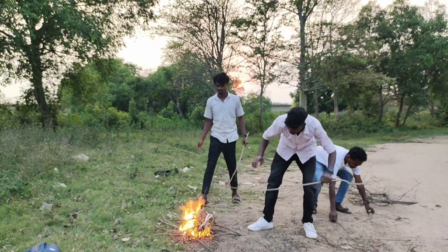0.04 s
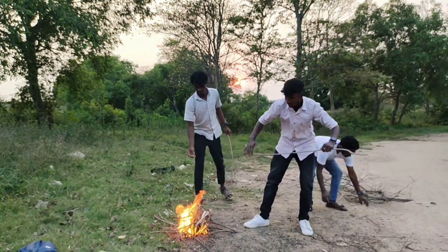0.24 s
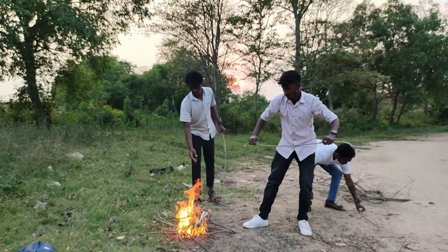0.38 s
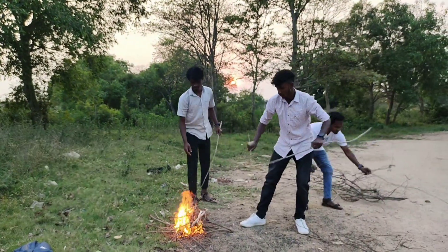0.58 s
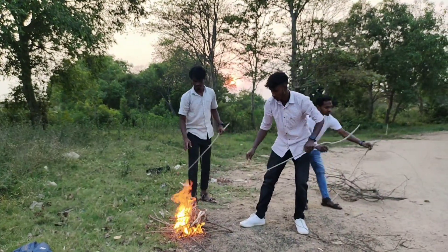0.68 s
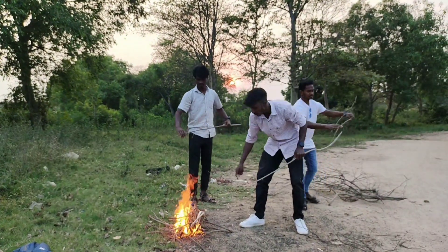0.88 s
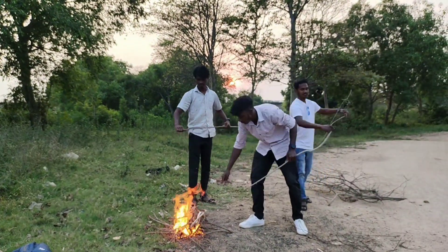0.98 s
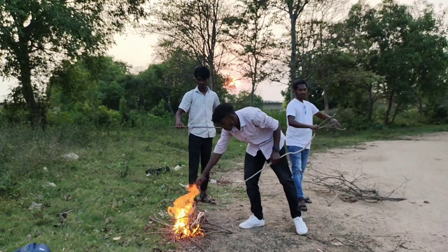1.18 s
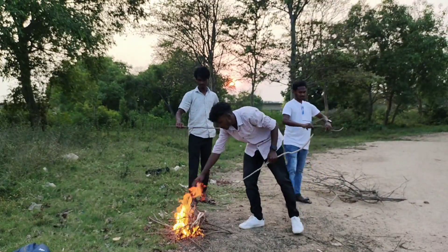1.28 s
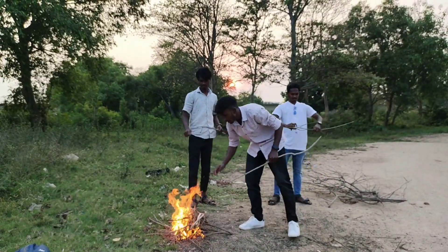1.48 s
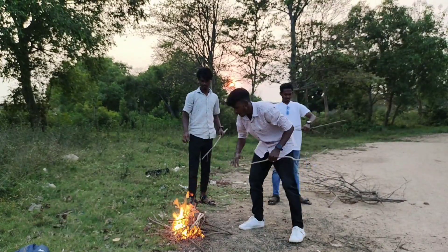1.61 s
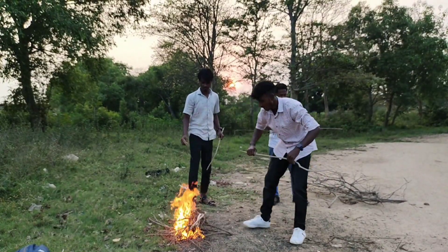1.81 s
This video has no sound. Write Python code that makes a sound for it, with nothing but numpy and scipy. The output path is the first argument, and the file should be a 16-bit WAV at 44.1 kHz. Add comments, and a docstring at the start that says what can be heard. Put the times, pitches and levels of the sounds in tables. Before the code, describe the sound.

A small twig fire crackles with one loud pop, over droning insects and twittering birds.

```python
"""Outdoors, beside a small fire of dry twigs. One twig bursts with a loud pop that echoes from
ground and bushes; smaller fractures snap and ring, escaping gas sizzles and the embers crackle.
Insects drone on the right and small birds twitter on the left. A low throb, perhaps a distant
engine, comes in groups of four over a soft rumble; its opening beats sound louder and brighter,
like dull knocks, on the left."""
import sys
import numpy as np
from scipy import signal
from scipy.fft import rfft, irfft
from scipy.io import wavfile
from scipy.ndimage import uniform_filter1d

SR = 44100
rng = np.random.default_rng(int(sys.argv[2]) if len(sys.argv) > 2 else 0)


def bounce(signal):
    """Save signal as a 16-bit WAV file at the path given by the first command-line argument."""
    frames = np.transpose(np.atleast_2d(signal))
    limited = np.clip(frames, -1, 1)
    pcm = np.round(limited * 32767).astype(np.int16)
    wavfile.write(sys.argv[1], SR, pcm)


N = 81585
T = np.arange(N) / SR

# Spectra of the surroundings: frequency_hz, relative_db
RUMBLE_SPECTRUM = [(20, -40), (45, -36), (70, -3.5), (105, 2.5), (180, 1), (250, -7.5), (450, -9),
                   (700, -30.5), (1500, -29.5), (4000, -95)]
AIR_SPECTRUM = [(100, 9), (700, 4), (1200, -2.5), (2500, -3.5), (5000, -4.5), (6600, -6), (9000, -4.5),
                (11000, -11), (15000, -11), (16000, -26)]
CHORUS_SPECTRUM = [(5000, -48), (6600, -21.5), (7200, 1.5), (7600, 0.5), (8200, 4), (8700, -5), (9100, -3),
                   (9800, -10.5), (10500, -32), (13000, -58)]
FLOCK_SPECTRUM = [(2000, -28), (3000, 1), (3900, 10), (4300, 4.5), (5000, 3.5), (5800, -23), (6600, -5),
                  (8000, -58)]
THROB_SPECTRUM = [(60, -45), (130, -1.5), (230, -3), (300, 1), (380, -15.5), (500, -5.5), (600, -28.5),
                  (900, -46)]
OPENING_BEAT_SPECTRUM = [(40, -59), (150, 1.5), (300, 12), (600, 7), (1100, 3), (1800, -27), (4000, -7),
                         (9000, -70), (16000, -77)]
# Insect voices: centre_hz, sweep_hz, sweeps_per_s, bandwidth_hz, level_db
INSECT_VOICES = [(8520, 196.7, 17, 140, -58.5), (8234, 170.5, 30, 170, -57.5)]
# Bird notes: start_s, length_s, start_hz, end_hz, level_db
BIRD_NOTES = [(.008, 0.039, 5550, 5950, -50), (0.033, 0.027, 5850, 4930, -55),
              (0.079, 0.028, 5300, 4860, -56), (0.124, 0.045, 5550, 5120, -57),
              (0.184, .028, 5240, 4850, -53), (0.245, .032, 5930, 6260, -51.5),
              (0.319, 0.019, 5860, 5340, -49.5), (.342, 0.028, 5300, 4700, -50.5),
              (.355, 0.024, 5710, 5930, -55), (0.392, 0.031, 5530, 5820, -56.5),
              (0.405, 0.025, 3780, 4090, -55.5), (0.423, .036, 5490, 5060, -50),
              (0.487, 0.016, 4720, 3700, -53), (0.524, .03, 5230, 4560, -53),
              (0.587, 0.015, 5960, 5550, -55), (0.629, 0.028, 6050, 5570, -53),
              (0.659, .05, 5480, 5140, -53.5), (0.736, .042, 4200, 3700, -55),
              (0.739, 0.019, 5000, 4400, -53.5), (.77, 0.02, 4970, 4390, -50.5),
              (.803, 0.025, 4570, 4970, -53.5), (0.844, 0.028, 4500, 4760, -51.5),
              (0.95, .048, 4510, 4860, -65.5), (1.12, 0.013, 5680, 4660, -61),
              (1.156, 0.013, 5340, 5050, -62), (1.202, 0.017, 6500, 5820, -50.5),
              (1.22, 0.014, 6100, 5720, -59), (1.277, 0.015, 5950, 5680, -56),
              (1.305, .042, 5110, 6350, -59), (1.379, .022, 5080, 4780, -62.5),
              (1.531, 0.017, 5650, 4550, -52), (1.552, 0.032, 5200, 4700, -49),
              (1.62, 0.03, 5400, 4560, -49.5), (1.669, 0.031, 5200, 4640, -52),
              (1.721, 0.021, 5120, 4670, -55), (1.754, 0.021, 5320, 4940, -54),
              (1.78, 0.023, 5250, 4640, -51.5), (1.809, .028, 5050, 4330, -55.5)]
# Level of the birds that join in, relative to each note: time_s, relative_db
NEIGHBOUR_LEVELS = [(0, -15), (.8, -10), (1.0, -17), (1.85, -17)]
# Accents of the four beats in a group: relative_db
BEAT_ACCENTS = [-4.5, -3, -2.5, -3.5]
# The throb's louder opening beats: start_s, level_db
OPENING_BEATS = [(0.0255, -36), (0.0593, -41.5), (0.0872, -43.5)]

# Spectra of the fire's sounds, the pop at each ear: frequency_hz, relative_db
RUSTLE_SPECTRUM = [(100, -25), (350, 5), (800, 9), (2000, 3), (3500, -4.5), (7000, -31), (16000, -20)]
GAS_SPECTRUM = [(300, 14.5), (1500, -17), (3600, 8.5), (6000, 0), (9000, -1), (12000, -2), (16000, -7)]
CRACK_SPECTRUM = [(200, -66), (1000, 0.5), (3000, 5.5), (6000, 3), (9000, 8), (13000, 4), (16000, 2)]
POP_LEFT_SPECTRUM = [(100, -55), (380, -5), (900, -14.5), (1800, -10), (2300, -7), (3400, 4.5), (4600, -3),
                     (6000, -20.5), (7200, 5), (7900, -23), (9100, -13), (10200, -7), (11800, 0.5),
                     (14000, -8), (16000, -17)]
POP_RIGHT_SPECTRUM = [(100, -43), (380, 0), (900, -9.5), (1800, -0.5), (3000, -23.5), (4400, 4.5),
                      (6000, -9.5), (7600, 8.5), (8500, 5), (10000, 2), (12000, -3), (14000, 3.5),
                      (16000, -7.5)]
# Rustles of twigs and dry ground: centre_s, half_width_s, level_db
RUSTLE_EVENTS = [(0.344, 0.01, -60.5), (0.642, 0.014, -60.5), (0.777, 0.011, -63), (1.037, 0.023, -65),
                 (1.077, 0.018, -61.5), (1.288, 0.015, -60), (1.342, 0.018, -63), (1.439, 0.013, -60.5),
                 (1.588, 0.12, -71), (1.717, 0.017, -65)]
# Spurts of escaping gas: start_s, length_s, level_db
GAS_SPURTS = [(0.338, 0.017, -50.5), (1.019, .03, -52)]
# Small fractures: start_s, ring_db, pitch_hz, ring_t60_s, crack_db
FRACTURES = [(0.0392, -33.5, 3600, 0.0045, -55), (.0982, -27.5, 3530, 0.0046, -41.5),
             (.1, -34, 3630, 0.023, -59), (0.1098, -62, 3700, .008, -44), (.3392, -38.5, 3860, 0.0047, -47),
             (0.802, -41.5, 3760, 0.0053, -39), (0.929, -41, 2200, 0.0031, -43),
             (1.0129, -38.5, 3510, 0.0035, -39.5), (1.028, -41, 3300, 0.0046, -56),
             (1.034, -41.5, 3180, 0.0055, -48), (1.4275, -30, 3480, 0.0026, -38.5),
             (1.594, -51, 3020, .004, -39), (1.6297, -42.5, 1400, .004, -56)]
# Modes of the bursting twig: pitch_hz, level_db, t60_s
TWIG_MODES = [(428, -36, 0.038), (1444, -35, 0.042), (2207, -27, .028), (2570, -38, 0.047),
              (2980, -35, 0.047), (3270, -36, 0.034), (3560, -38, 0.035), (4086, -35.5, 0.039),
              (8710, -29.5, 0.045), (11400, -31, 0.02)]


def amp(db):
    """Amplitude grows tenfold for every 20 dB."""
    return 10 ** (np.asarray(db) / 20)


def unit(x):
    """Normalisation to an rms of 1."""
    return x / np.sqrt(np.mean(x ** 2) + 1e-20)


def spectral_gain(spectrum, hz):
    """A spectral envelope, interpolated in decibels over log frequency."""
    points_hz, db = np.transpose(spectrum)
    return amp(np.interp(np.log(hz + 1), np.log(points_hz), db))


def add(mix, start_s, sound):
    """Superposition: a sound adds to the mix from its start time."""
    part = mix[..., max(round(start_s * SR), 0):][..., :sound.shape[-1]]
    part += sound[..., :part.shape[-1]]


def pan(db):
    """Interaural level difference, left minus right, as two gains."""
    return amp([[db / 2], [-db / 2]])


def noise(spectrum, coherence):
    """Partial coherence: coloured noise of which the ears share a part."""
    white = rng.standard_normal((3, N))
    ears = np.sqrt(coherence) * white[2] + np.sqrt(1 - coherence) * white[:2]
    return unit(irfft(rfft(ears) * spectral_gain(spectrum, np.fft.rfftfreq(N, 1 / SR)), N))


def drift(cutoff_hz):
    """Random modulation: low-passed noise of unit rms."""
    low_pass = np.exp(-(np.fft.rfftfreq(N, 1 / SR) / cutoff_hz) ** 2)
    return unit(irfft(rfft(rng.standard_normal(N)) * low_pass, N))


def impulse(spectrum, size=2048):
    """Minimum phase turns a spectrum into a causal click of unit energy."""
    log_gain = np.log(spectral_gain(spectrum, abs(np.fft.fftfreq(size, 1 / SR))))
    click = np.fft.ifft(np.exp(signal.hilbert(log_gain).conj())).real[:size // 2]
    return click / np.linalg.norm(click)


def scatter(t60_s, size=12000):
    """Diffuse scattering from ground and bushes: a decaying stereo tail of unit energy."""
    tail = rng.standard_normal((2, size)) * amp(-60 * T[:size] / t60_s)
    return tail / np.linalg.norm(tail, axis=1, keepdims=True)


def through(x, response):
    """Linear filtering: convolution with an impulse response."""
    return signal.fftconvolve(np.atleast_2d(x), np.atleast_2d(response), axes=1)[:, :N]


def background(rumble_db=-56.5, air_db=-61.5):
    """Broadband noise: a coherent low rumble and the diffuse hiss of open air, both wavering."""
    rumble = amp(rumble_db + 1.27 * drift(22)) * noise(RUMBLE_SPECTRUM, coherence=1.0)
    air = amp(air_db + 2.67 * drift(32)) * noise(AIR_SPECTRUM, coherence=0.13)
    return pan(0.42) * rumble + pan(1.1) * air


def insects(chorus_db=-58.5, rate_spread=.25, depth_spread=0.2945, left_db=-17):
    """Frequency modulation: two shrill voices warble quickly above a steady chorus."""
    out = amp(chorus_db + 1.3 * drift(120)) * noise(CHORUS_SPECTRUM, coherence=0.48)
    for hz, sweep_hz, rate, width_hz, db in INSECT_VOICES:
        depth = 1 + depth_spread * drift(29.8)
        warble = depth * np.sin(2 * np.pi * np.cumsum(rate * (1 + rate_spread * drift(12))) / SR)
        carrier = np.exp(2j * np.pi * np.cumsum(hz + sweep_hz * warble) / SR)
        broadening = 1 + drift(width_hz) + 1j * drift(width_hz)
        out += amp(db) * unit((carrier * broadening).real)
    return amp([[left_db], [0]]) * out


def chirp(length_s, start_hz, end_hz, jitter_hz=70):
    """A frequency glide: one thin, unsteady note that swells and fades."""
    progress = np.arange(0, length_s, 1 / SR) / length_s
    jitter = np.interp(progress, np.linspace(0, 1, 12), rng.standard_normal(12))
    hz = start_hz + (end_hz - start_hz) * progress + jitter_hz * jitter
    return np.sin(np.pi * progress) ** 0.56 * np.sin(2 * np.pi * np.cumsum(hz) / SR)


def birds(neighbours=8, spread_s=.022, pitch_spread=.07, roughness=.45, flock_db=-63.5, right_db=-10.5):
    """Chorus effect: fainter neighbours join each chirp, off in time and pitch, over a far flock."""
    calls = np.zeros(N)
    for start_s, length_s, start_hz, end_hz, db in BIRD_NOTES:
        add(calls, start_s, amp(db) * chirp(length_s, start_hz, end_hz))
        neighbour_db = db + np.interp(start_s, *np.transpose(NEIGHBOUR_LEVELS))
        for offset, detune, bend in rng.standard_normal((neighbours, 3)):
            start_ratio, end_ratio = np.exp(pitch_spread * np.array([detune, detune + .5 * bend]))
            note = chirp(length_s, start_hz * start_ratio, end_hz * end_ratio)
            add(calls, start_s + spread_s * offset, amp(neighbour_db) * note)
    calls *= 1 + roughness * drift(520)
    flock = amp(flock_db + 2 * drift(46)) * noise(FLOCK_SPECTRUM, coherence=0.044)
    reverberation = amp(-6) * through(calls, scatter(t60_s=.25))
    return amp([[0], [right_db]]) * (calls + reverberation + flock)


def throb(start_s=.0018, group_s=.2506, beat_s=.0302, level_db=-41, uneven_db=1.73,
          centre_hz=260, fall_hz_per_s=73000):
    """Group delay: in each soft beat the lows arrive last, so its pitch falls. Beats come in fours."""
    beats, hz = np.zeros(N), np.fft.rfftfreq(2048, 1 / SR)
    for group in range(8):
        for beat, accent_db in enumerate(BEAT_ACCENTS):
            at = round((start_s + group * group_s + beat * beat_s) * SR)
            beats[at:at + 1] = amp(level_db + accent_db + uneven_db * rng.normal())
    phase = np.pi * (hz - centre_hz) ** 2 / fall_hz_per_s
    pulse = np.fft.fftshift(irfft(1j * spectral_gain(THROB_SPECTRUM, hz) * np.exp(1j * phase)))
    return pan(3.2) * signal.fftconvolve(beats, pulse / abs(pulse).max(), "same")


def opening_beats(ring_hz=285, ring_t60_s=0.034, ring_db=-5):
    """Damped resonance: the throb's first beats, louder and brighter, like dull knocks on the left."""
    t, out, click = T[:1024], np.zeros(N), impulse(OPENING_BEAT_SPECTRUM)
    ring = amp(ring_db - 60 * t / ring_t60_s) * np.cos(2 * np.pi * ring_hz * t)
    beat = click / abs(click).max() + ring
    for start_s, db in OPENING_BEATS:
        add(out, start_s, amp(db) * beat)
    return pan(19.0) * out


def embers(ticks_per_s=60, spread_db=0.5, level_db=-74):
    """A Poisson process: independent ticks make a faint, dull crackle deep in the embers."""
    ticks = (rng.random(N) < ticks_per_s / SR) * amp(spread_db * np.minimum(rng.exponential(1, N), 3))
    dull_ticks = through(ticks, impulse(RUSTLE_SPECTRUM))
    return amp(level_db) * pan(1.7) * unit(through(dull_ticks, scatter(t60_s=0.0052)))


def sizzles_and_rustles(edge_s=0.0013, grain_db=1.0):
    """Amplitude-modulated noise: gas hisses out in short grainy spurts, and dry twigs rustle."""
    spurts = np.zeros(N)
    for start_s, length_s, db in GAS_SPURTS:
        attack = np.clip((T - start_s) / edge_s, 0, 1)
        release = np.exp(-np.maximum(T - start_s - length_s, 0) / edge_s)
        spurts += amp(db) * attack * release
    swells = sum(amp(db) * np.exp(-((T - centre_s) / half_width_s) ** 2 / 2)
                 for centre_s, half_width_s, db in RUSTLE_EVENTS)
    grain = unit(amp(grain_db * drift(420)))
    gas = pan(3.6) * spurts * noise(GAS_SPECTRUM, coherence=0.38)
    rustle = pan(1.4) * swells * noise(RUSTLE_SPECTRUM, coherence=0.53)
    return grain * (gas + rustle)


def snaps(ring_top_hz=4800, rise_s=.0003, pitch_spread=0.11, crack_t60_s=0.0029, scatter_db=-8):
    """Impulsive excitation: small fractures crack and the wood rings briefly; the ground scatters both."""
    t, rings, cracks = T[:3000], np.zeros(N), np.zeros(N)
    for start_s, ring_db, hz, t60_s, crack_db in FRACTURES:
        wobble = uniform_filter1d(rng.standard_normal(len(t)), 9) * 3  # unit variance
        phase = 2 * np.pi * np.cumsum(hz * (1 + pitch_spread * wobble)) / SR
        envelope = np.minimum(t / rise_s, 1) * amp(ring_db - 60 * t / t60_s)
        add(rings, start_s, envelope * np.sin(phase))
        add(cracks, start_s, amp(crack_db - 60 * t / crack_t60_s) * rng.choice([-1., 1.], len(t)))
    rings = signal.sosfilt(signal.butter(6, ring_top_hz, fs=SR, output="sos"), rings)
    direct = pan(9.7) * rings + pan(2.0) * through(cracks, impulse(CRACK_SPECTRUM))
    return direct + amp(scatter_db) * through(direct, scatter(t60_s=.045))


def rupture(t, spike=1.28, fast_t60_s=0.02, slow_t60_s=0.054, fibres=4, gap_s=.0004, fibre_t60_s=0.017,
            ground_echo_s=.0016, ground_echo_db=-5.5):
    """Brittle fracture: a spike, fibres tearing in turn, a ground echo and a fading spray of cracks."""
    decay = amp(-60 * t / fast_t60_s) + amp(-8 - 60 * t / slow_t60_s)
    pulses = rng.choice([-1., 1.], (2, len(t))) * decay
    pulses[:, 0] = spike
    for tear_s in gap_s * np.cumsum(rng.uniform(.5, 1.5, fibres)):
        pulses[:, round(tear_s * SR)] = spike * amp(-7 - 60 * tear_s / fibre_t60_s) * rng.choice([-1., 1.])
    pulses[:, round(ground_echo_s * SR)] = spike * amp(ground_echo_db)
    return pulses


def pop(start_s=.2332, gain_db=-17, bush_echo_s=.03, bush_echo_db=-25, bush_top_hz=6000):
    """Free vibration and reflection: a twig bursts, its modes ring, the bushes return a duller echo."""
    t, out = T[:12000], np.zeros((2, N))
    ear_responses = np.array([impulse(POP_LEFT_SPECTRUM), impulse(POP_RIGHT_SPECTRUM)])
    add(out, start_s, amp(gain_db) * pan(0.81) * through(rupture(t), ear_responses))
    dulled = signal.lfilter(*signal.butter(1, bush_top_hz, fs=SR), out)
    add(out, bush_echo_s, amp(bush_echo_db) * through(dulled, scatter(t60_s=0.28)))
    for hz, db, t60_s in TWIG_MODES:
        phase = 2 * np.pi * (hz * t + rng.uniform(0, 0.33, (2, 1)))
        add(out, start_s, pan(1.2) * amp(db - 60 * t / t60_s) * np.sin(phase))
    return out


def scene():
    """Superposition: the pressures of the fire and its surroundings add at each ear."""
    fire = pop() + snaps() + embers() + sizzles_and_rustles()
    return fire + opening_beats() + throb() + birds() + insects() + background()


def record(dry, low_cut_hz=55, top_hz=15650):
    """Band limiting: a gentle low cut and a steep treble edge."""
    low_cut = signal.butter(1, low_cut_hz, "high", fs=SR, output="sos")
    low_pass = signal.firwin(255, top_hz, window=("kaiser", 8), fs=SR)
    return signal.oaconvolve(signal.sosfilt(low_cut, dry), low_pass[None], "same")


dry = scene()
out = record(dry)
bounce(out)
```